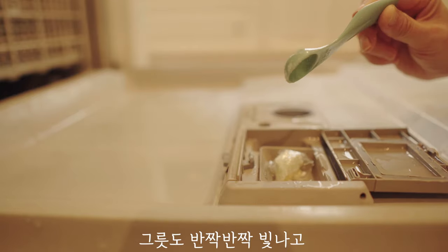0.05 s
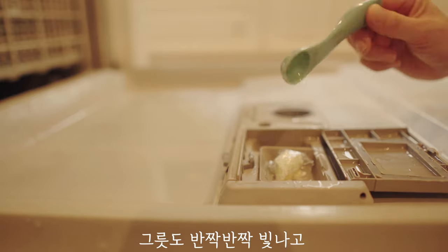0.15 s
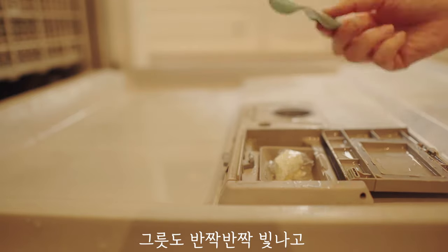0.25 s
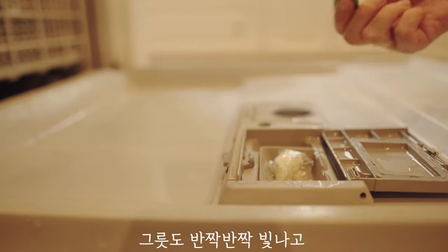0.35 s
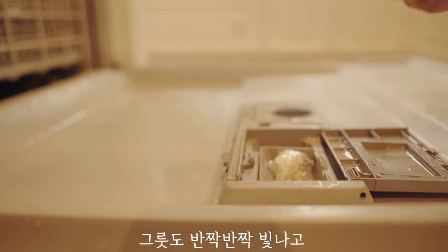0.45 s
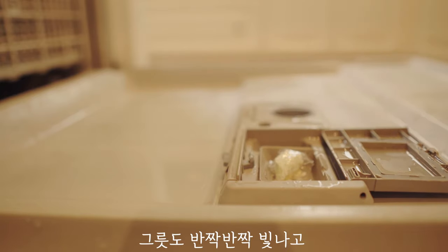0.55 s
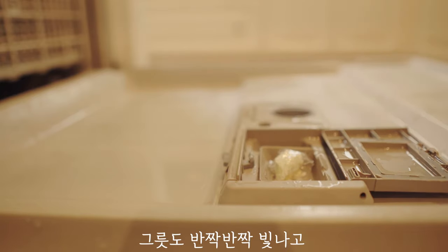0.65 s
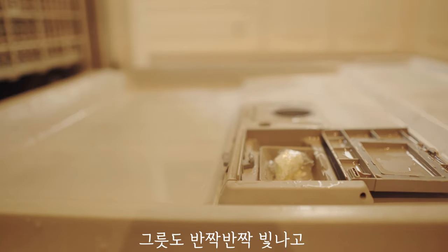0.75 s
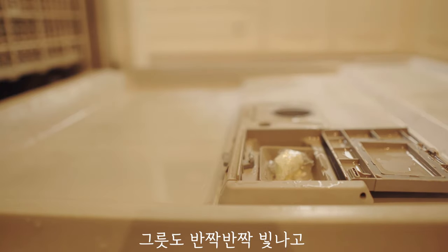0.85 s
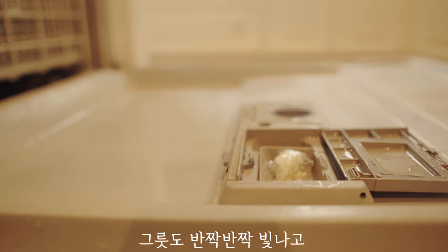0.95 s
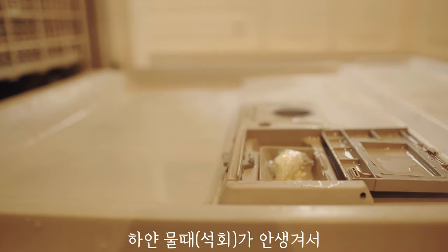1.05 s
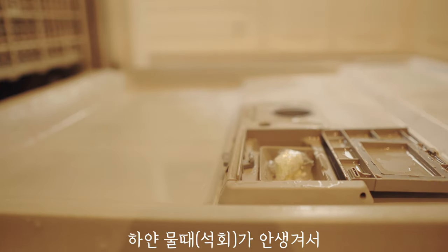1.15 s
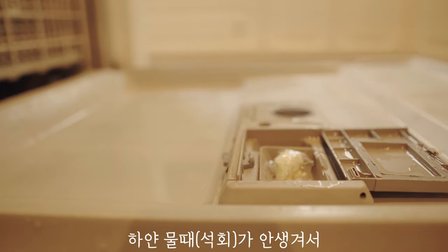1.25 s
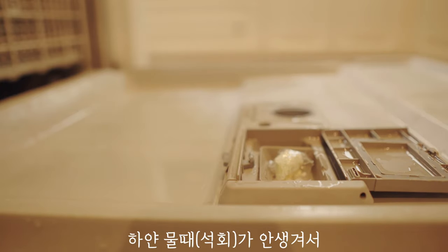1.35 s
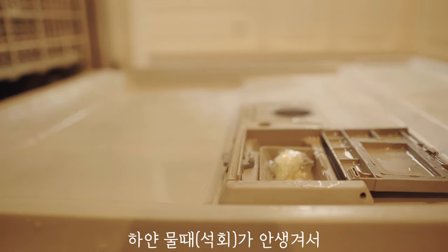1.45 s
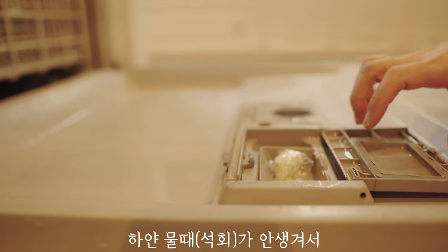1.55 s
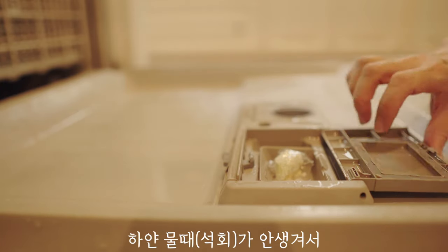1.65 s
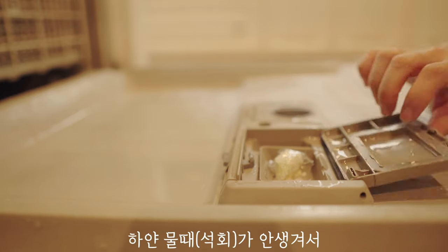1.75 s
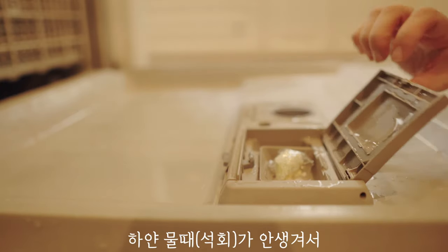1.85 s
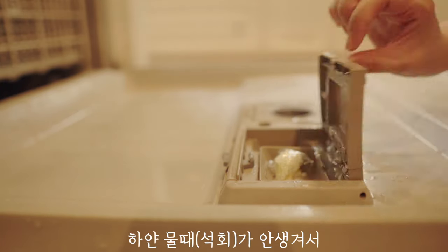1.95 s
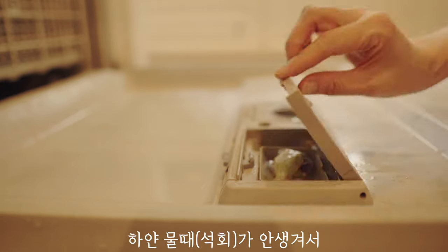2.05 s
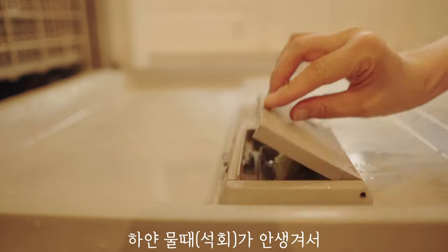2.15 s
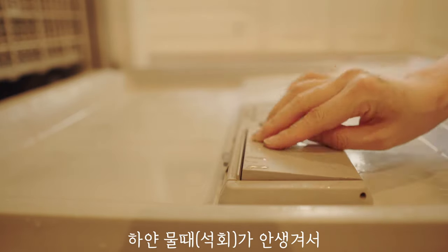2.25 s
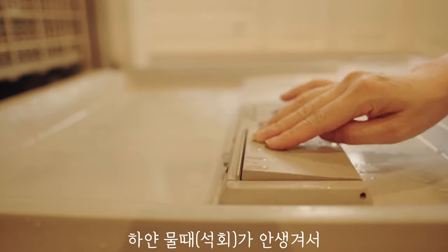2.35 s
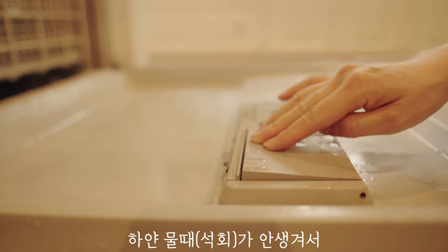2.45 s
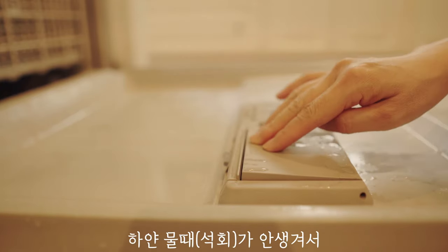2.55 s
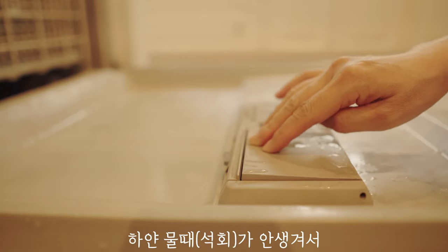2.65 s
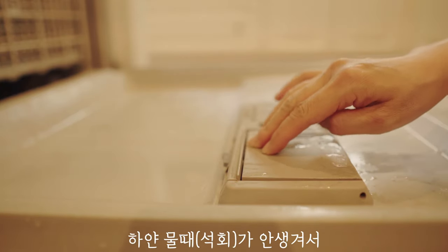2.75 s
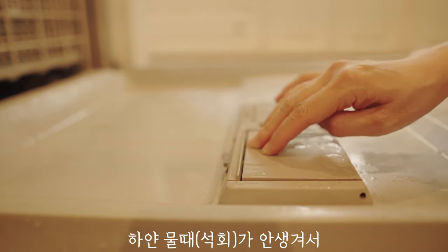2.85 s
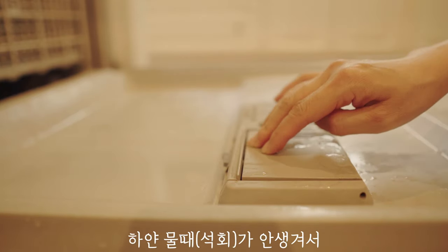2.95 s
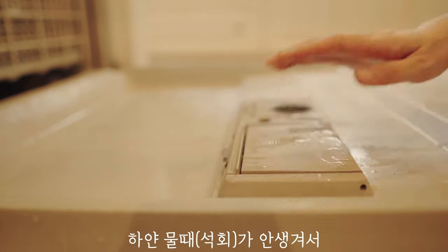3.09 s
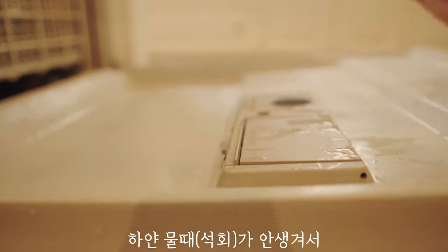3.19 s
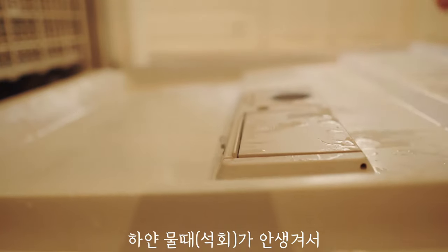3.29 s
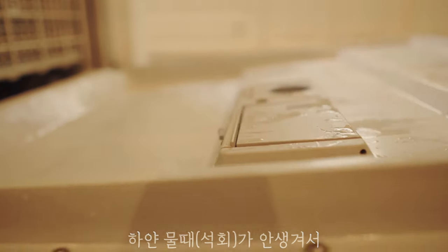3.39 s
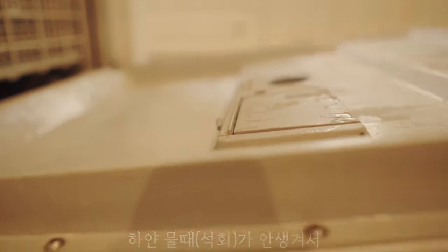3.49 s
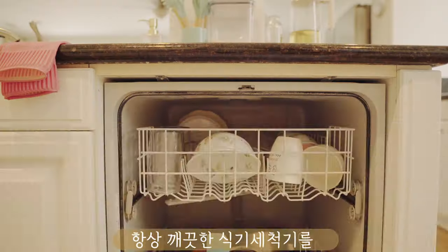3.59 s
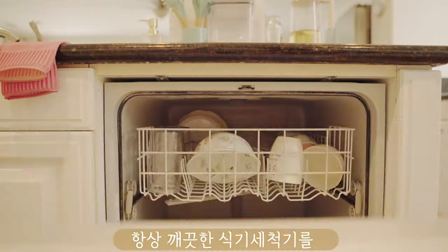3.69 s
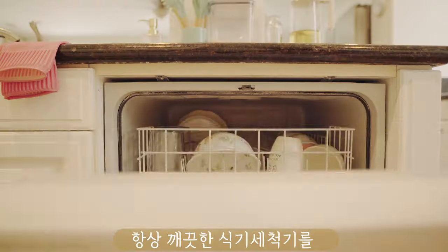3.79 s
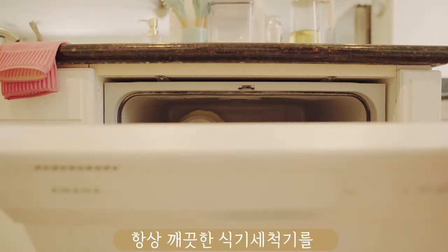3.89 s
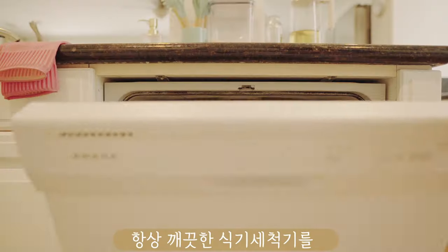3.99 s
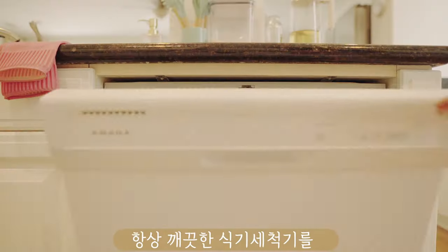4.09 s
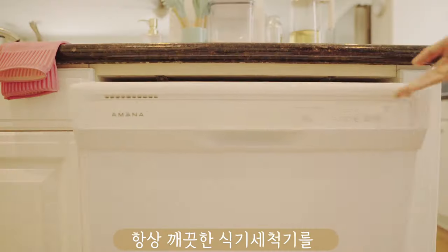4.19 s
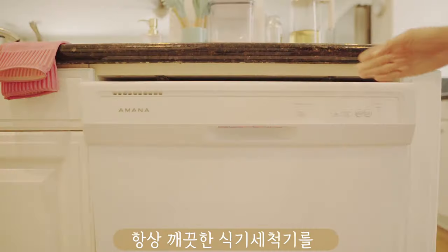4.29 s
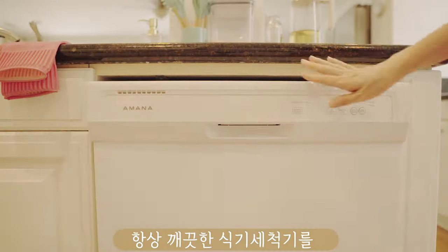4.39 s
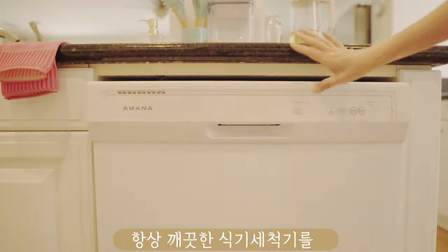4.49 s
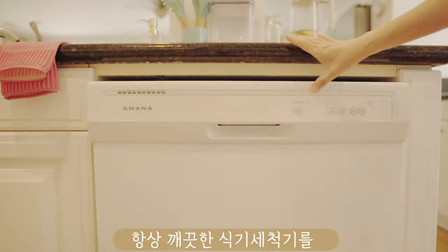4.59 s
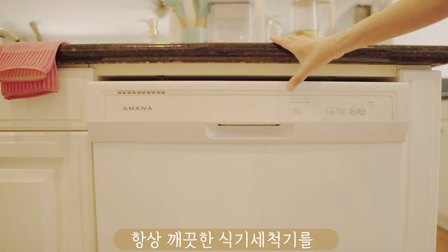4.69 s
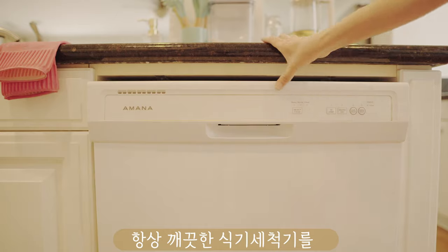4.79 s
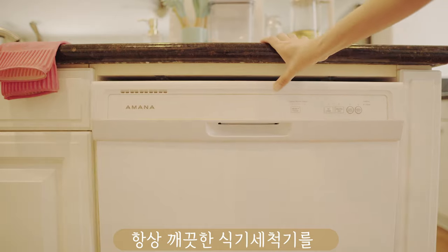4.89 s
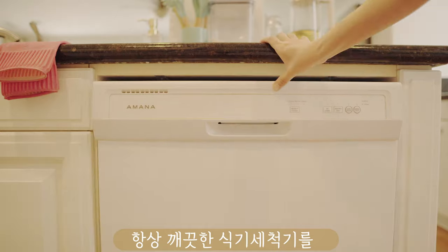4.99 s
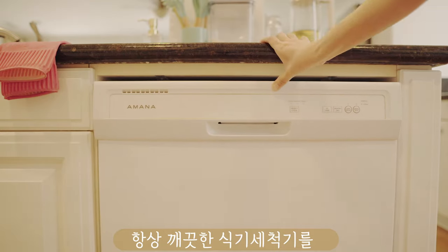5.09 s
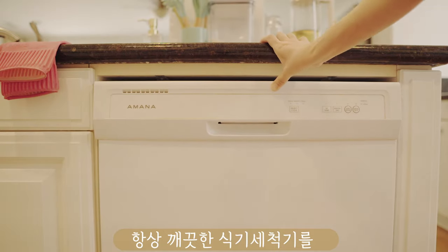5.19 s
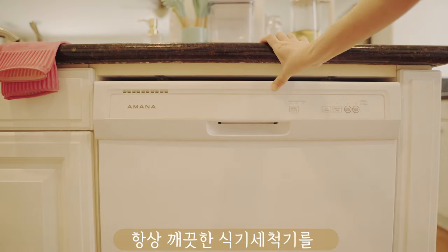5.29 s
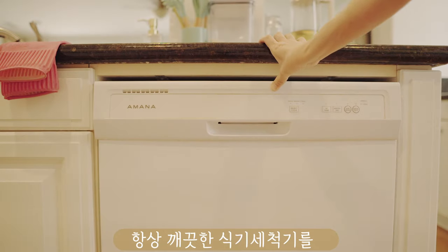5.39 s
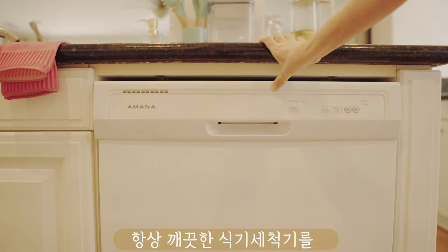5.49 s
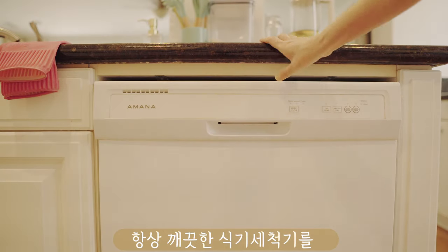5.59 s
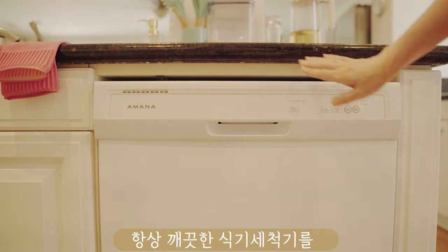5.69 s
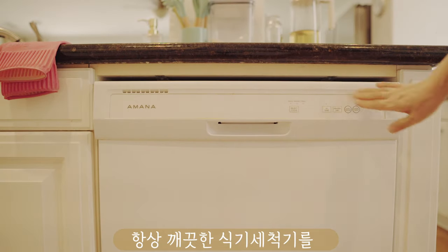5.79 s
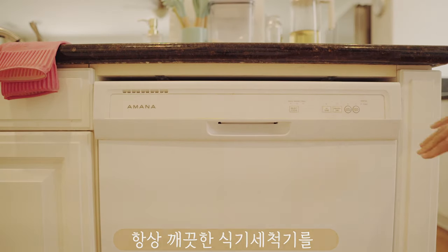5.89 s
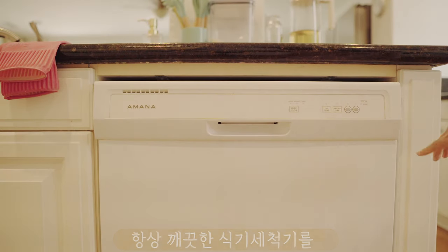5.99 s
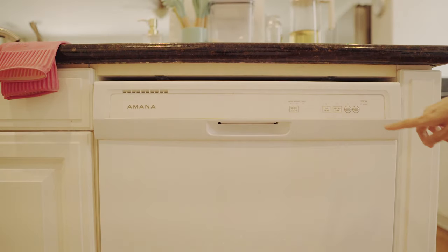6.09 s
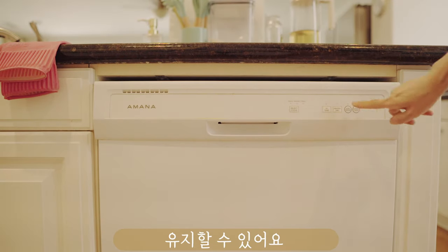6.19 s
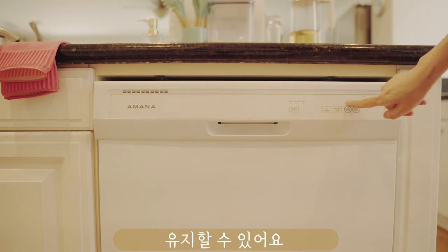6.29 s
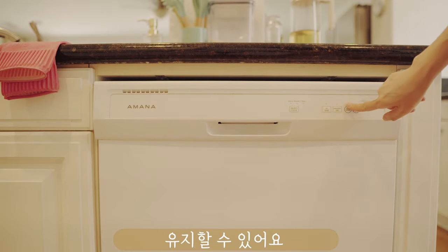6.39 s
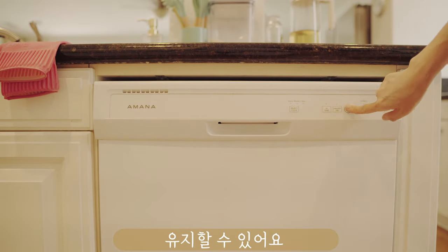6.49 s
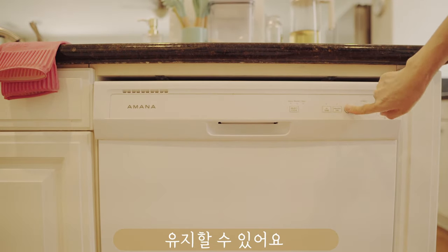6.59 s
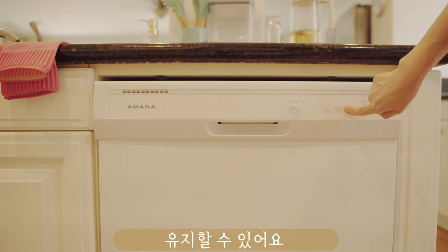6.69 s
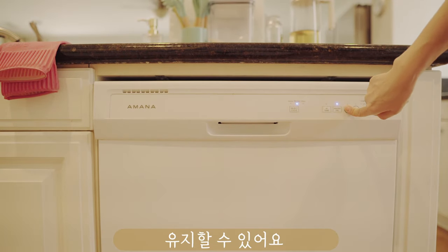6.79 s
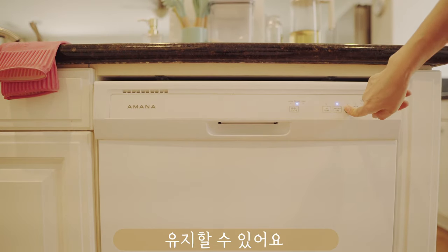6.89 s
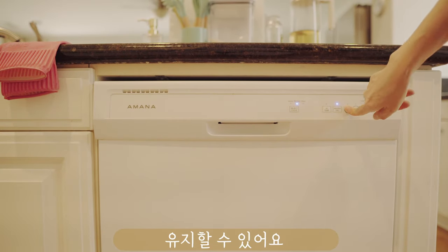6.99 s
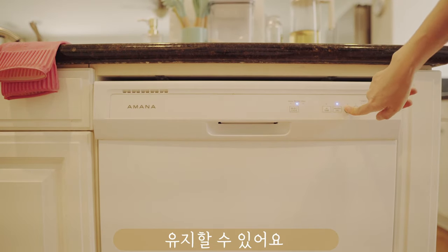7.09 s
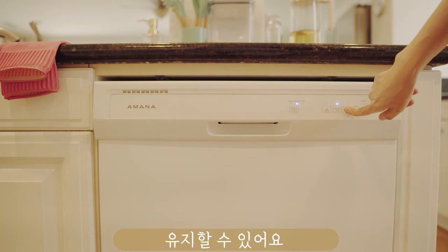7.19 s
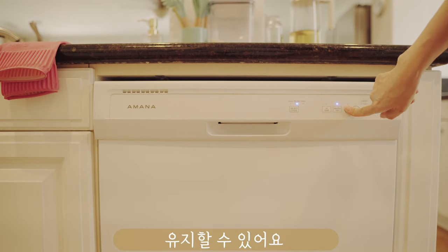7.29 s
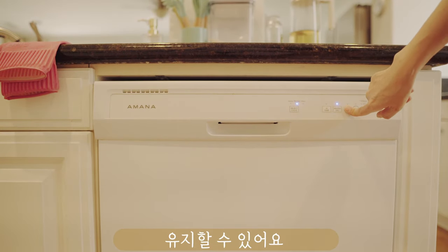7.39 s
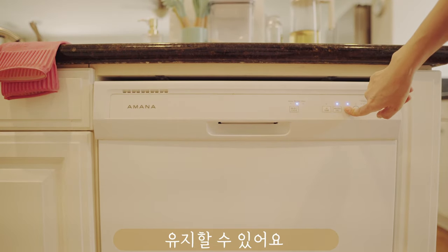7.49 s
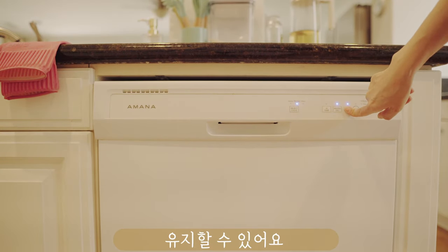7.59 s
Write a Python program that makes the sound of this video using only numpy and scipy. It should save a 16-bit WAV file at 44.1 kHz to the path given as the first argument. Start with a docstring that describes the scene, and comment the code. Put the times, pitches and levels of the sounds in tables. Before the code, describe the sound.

A plastic detergent lid clicks and snaps shut, then a dishwasher door creaks up, thumps into its latch, and buttons click.

```python
"""A dishwasher is made ready in a small kitchen. First a hand rustles about, nudging the plastic lid of
the detergent cup, which clicks, flexes and rubs on its hinge, falls shut and is pressed until it snaps.
From 3.6 s the door swings up on creaking springs and thumps into its latch at 5.2 s, the cabinet
droning low. Last, from 6.7 s, panel buttons click. Quiet room air lies under it all."""
import sys
import numpy as np
from scipy import signal
from scipy.fft import rfft, irfft
from scipy.io import wavfile
from scipy.ndimage import uniform_filter1d

SR = 44100
rng = np.random.default_rng(int(sys.argv[2]) if len(sys.argv) > 2 else 0)


def waveform_to_disk(signal):
    """Save audio, clipped to [-1, 1], as 16-bit WAV at the path in sys.argv[1]."""
    frames = np.transpose(np.atleast_2d(signal))
    scaled = np.clip(frames, -1, 1) * 32767
    samples = np.round(scaled).astype(np.int16)
    wavfile.write(sys.argv[1], SR, samples)


N = 337365
T = np.arange(SR) / SR  # seconds into one hit
NOW = np.arange(N) / SR  # seconds into the scene
TOP_HZ = 15900


# Nudges of the lid. Each row: start in seconds, level in dB, rise in seconds, tilt in dB per octave.
LID_CLICKS = [(.918, -48.5, 0.0028, 4.5), (1.088, -48, .004, 5.5), (1.132, -39, .0015, -0.5),
              (1.1765, -29.5, 0.0025, 1.5), (1.543, -35.5, .0025, -2.5), (1.5892, -27.5, 0.0031, 1),
              (2.217, -44.5, 0.0027, 5), (2.607, -52.5, 0.0026, 1), (3.068, -45, 0.0022, -7),
              (3.554, -48.5, 0.008, 6)]
# Their plastic tone. Each row: frequency in Hz, gain in dB.
LID_COLOUR = [(120, -58), (200, -16), (465, -4), (671, 0), (1530, -2), (2910, -9), (3310, -17.5),
              (4040, -9), (5040, -22.5), (8740, -17.5), (9580, -26), (10300, -23), (15100, -30),
              (16000, -39)]
# The lid's short ring. Each row: pitch in Hz, gain in dB, decay in seconds.
LID_MODES = [(786, 7.5, 0.12), (1423, -6, 0.22), (2135, 7, 0.1), (2560, -12, 0.25), (4090, -0.5, 0.13),
             (4350, -1.5, 0.092), (7400, -4.5, 0.13), (8940, -8, 0.12)]

def lid_clicks():
    """The plastic lid clicks and rings briefly as it is nudged on its hinge."""
    return clicks(LID_CLICKS, LID_COLOUR, t60=0.058, room_db=-7, modes=LID_MODES, modes_db=-8)


# The lid lands. Each row: start in seconds, level in dB, rise in seconds, tilt in dB per octave.
LID_FALL = [(2.2812, -24, 0.0019, 0)]
# The cup's hollow clack. Each row: frequency in Hz, gain in dB.
CUP_COLOUR = [(400, -16), (650, -11), (810, -21), (1050, 2), (1320, -2), (1700, -21), (2600, -15),
              (4500, -32.5), (8000, -35), (13500, -32), (16000, -38)]
# Its tight cluster of tones. Each row: pitch in Hz, gain in dB, decay in seconds.
CUP_MODES = [(1085, 0, .27), (1133, 2, 0.27), (1190, -5, 0.38), (1285, 0.5, 0.26)]

def lid_fall():
    """The lid falls shut and sets the cup ringing."""
    return clicks(LID_FALL, CUP_COLOUR, t60=0.043, room_db=-6.5, modes=CUP_MODES, modes_db=-4)


# The snap. Each row: start in seconds, level in dB, rise in seconds, tilt in dB per octave.
CATCH = [(2.7735, -33, 0.00052, 0.84)]
# Its full-bodied tone. Each row: frequency in Hz, gain in dB.
CATCH_COLOUR = [(88, -49), (150, -38), (240, -3.5), (334, -6.5), (376, 0.5), (439, -7.5), (637, -3.5),
                (905, -18.5), (1260, -4.5), (2140, -12), (2920, -11), (6510, -20), (7620, -23.5),
                (9630, -21), (16000, -28.5)]
# Its long ring. Each row: pitch in Hz, gain in dB, decay in seconds.
CATCH_MODES = [(112, -2.5, 0.84), (372, 9, 0.28), (1270, -2, 0.82), (1660, -2, 0.31), (2500, -5.5, 0.72),
               (2770, -15, 0.58), (3768, -8, 0.74), (4750, -15, 1), (6400, -10, 0.6), (9000, -7, .28),
               (9760, -4, .28), (11100, -4, 0.27)]

def catch_snap():
    """The lid's catch snaps in with a sharp crack that fills the room."""
    return clicks(CATCH, CATCH_COLOUR, t60=0.033, room_db=11, modes=CATCH_MODES, modes_db=2.5)


# Blows on the liner. Each row: start in seconds, level in dB, contact time in seconds.
LINER_THUDS = [(1.544, -38, 0.0031), (1.69, -39, 0.0097), (1.77, -41, 0.014), (2.2835, -20.5, 0.0014),
               (2.770, -32, 0.0005), (2.83, -39, 0.017), (3.068, -37.5, 0.0019), (3.5585, -29, 0.0015),
               (3.573, -31, 0.0026)]
# Its boxy body. Each row: pitch in Hz, gain in dB, decay in seconds.
LINER_MODES = [(72.8, -23, 0.82), (106.4, -13, 0.44), (185, -16, 0.2), (212, -2.5, 0.2), (237.5, 6.5, 0.1),
               (366, -2, 0.16), (417, -7, 0.21), (583, -12, 0.28), (700, -3.5, 0.12)]

def liner_thuds():
    """Soft blows wake the low modes of the hollow door liner."""
    return thuds(LINER_THUDS, LINER_MODES, room_db=-14.0)


# The lid bends as it turns over. Each row: start in seconds, level in dB, pitch in Hz, rise in seconds.
LID_FLEXES = [(1.605, -28.5, 253, 0.0027), (1.724, -40, 246.5, 0.0074), (2.038, -37, 231, 0.003),
              (2.088, -38.5, 250, 0.0071), (2.189, -30.5, 249, 0.013)]

def lid_flexes(t60=0.12):
    """The lid's lowest bending mode swells and dies; its pitch shifts with the grip."""
    out = np.zeros(N)
    for start, db, hz, rise in LID_FLEXES:
        swell = 1 - np.exp(-(T / rise) ** 2)
        add(out, start, dose(ring([(hz, 0, t60)]) * swell, db))
    return out


# Turns of the lid. Each row: start in seconds, length in seconds, relative level in dB.
HINGE_RUBS = [(1.59, 0.22, -47), (1.87, 0.36, -44), (2.21, 0.12, -39)]
# The hinge's low grumble. Each row: pitch in Hz, gain in dB, decay in seconds.
HINGE_MODES = [(102, -10.5, 0.15), (241, 2, 0.056), (295, -7, 0.028), (378, -6.5, 0.058), (630, -18, .06)]

def hinge_rub():
    """The hinge sticks and slips coarsely as the lid turns."""
    loudness = moves(HINGE_RUBS, attack_share=0.23, release_s=0.078)
    return friction(HINGE_MODES, grain_db=3.0, grain_hz=118.0) * loudness


# A finger slide. Each row: start in seconds, length in seconds, relative level in dB.
SLIDES = [(3.12, 0.1, -45)]
# Faint whistling tones. Each row: pitch in Hz, gain in dB, decay in seconds.
WHISTLE_TONES = [(2140, -0.5, 0.066), (3040, 1, 0.035), (3620, -3, .04), (4200, -9, .05), (5180, -9, .05),
                 (6060, -7, 0.033), (7060, -9, .05), (10300, -5, .03)]

def finger_slide():
    """Fingertips slide off the shut lid: a brief, thin, high scrape with faint whistling tones."""
    loudness = moves(SLIDES, attack_share=0.26, release_s=0.037)
    return friction(WHISTLE_TONES, grain_db=2, grain_hz=898) * loudness


# Creaks of the moving door. Each row: start in seconds, length in seconds, relative level in dB.
CREAKS = [(3.615, 0.21, -36.5), (3.86, 0.052, -32.5), (3.965, 0.27, -33), (4.35, 0.039, -42),
          (4.86, 0.19, -47.5), (5.075, 0.036, -47)]
# The door skin's dark tone. Each row: frequency in Hz, gain in dB.
SKIN_COLOUR = [(70, -14.5), (120, -5.5), (175, -7), (290, -3.5), (400, -5), (550, -2), (780, -7.5),
               (1050, -7), (1250, -18), (2010, -19), (3800, -27), (6500, -45)]
# The twang of the coils. Each row: pitch in Hz, gain in dB, decay in seconds.
SPRING_MODES = [(170, -5.5, 0.24), (283.6, -2, 0.13), (502, -1.5, 0.15), (582, -5.5, 0.13),
                (689, -4.5, .12), (842, -4, 0.1), (1008, 0, 0.15), (1100, -3, 0.088)]

def springs(slips_per_s=450, scatter_db=8, coil_db=-5, room_db=-2):
    """The stretched springs slip in uneven jerks; each jerk rings the coils and the door skin."""
    slipping = rng.random(N) < slips_per_s / SR
    jerks = slipping * rng.choice([-1, 1], N) * undb(scatter_db * rng.random(N))
    skin = colour(through(jerks, crack(rise=0.00039, t60=0.022)), SKIN_COLOUR)
    coils = through(jerks, ring(SPRING_MODES))
    creak = level(level(skin, 0) + level(coils, coil_db), -1.7)
    creak *= moves(CREAKS, attack_share=0.057, release_s=0.038)
    return creak + undb(room_db) * through(creak, kitchen())


# Bumps of the door. Each row: start in seconds, level in dB, contact time in seconds.
DOOR_THUMPS = [(3.67, -38, 0.0021), (3.84, -38.5, 0.0034), (4.25, -32.5, 0.013), (4.37, -35.5, 0.011),
               (4.505, -37.5, 0.0078), (4.924, -28.5, 0.0025), (5.018, -31, 0.013), (5.07, -37.5, 0.019),
               (5.209, -24, 0.0017), (5.475, -33.5, 0.0071)]
# Its deep boom. Each row: pitch in Hz, gain in dB, decay in seconds.
DOOR_MODES = [(76.9, -8, 0.64), (177.4, -5.5, 0.21), (251.5, -11, 0.64), (297.5, -11.5, 0.34),
              (426, -5, 0.26), (560, -6.5, 0.4), (783, -16, 0.41)]

def door_thumps():
    """The whole door bumps on its springs and seal."""
    return thuds(DOOR_THUMPS, DOOR_MODES, room_db=-18.0)


# A run of ticks. Each row: start in seconds, level in dB, rise in seconds, tilt in dB per octave.
RATCHET = [(4.054, -50, .003, 2), (4.082, -51, .003, 5), (4.105, -43.5, .003, -0.5),
           (4.134, -44, 0.0027, -0.5), (4.166, -46.5, .003, 0), (4.203, -46.5, 0.0027, 2),
           (4.238, -47, .003, -1), (4.275, -51, 0.0027, -4), (4.377, -45.5, 0.0017, 2)]
# The hook's bright tone. Each row: frequency in Hz, gain in dB.
HOOK_COLOUR = [(900, -6), (1900, 3.5), (4500, -12.5), (7500, -11.5), (9300, -7), (12000, -13), (14000, -16),
               (16000, -26)]
# Its high ping. Each row: pitch in Hz, gain in dB, decay in seconds.
HOOK_MODES = [(3460, -1, 0.13), (5780, 5, 0.078), (6700, -3, 0.12), (8500, 2, 0.086), (9250, -2, 0.13),
              (9480, -7, .12), (11700, -8, .12), (12500, -8, .12), (13800, -5, .12)]

def hook_ratchet():
    """A spring hook ratchets over its seat, pinging at each skip."""
    return clicks(RATCHET, HOOK_COLOUR, t60=0.047, room_db=-4.5, modes=HOOK_MODES, modes_db=-2.5)


# Knocks of hinges and latch, then the slam. Each row: start in seconds, level in dB, rise in seconds,
# tilt in dB per octave, ring of the contact point in Hz, its lift in dB.
LATCH_KNOCKS = [(3.622, -31.5, 0.0011, -7, 750, 11), (3.678, -37, 0.0045, -5.5, 520, 13),
                (3.881, -41.5, 0.0016, -1, 2900, 14), (4.035, -30.5, 0.0083, -5, 600, 13),
                (4.238, -33.5, 0.0044, -3.5, 586, 15), (4.9085, -34, 0.00086, -2, 2250, 9),
                (4.936, -47, .001, 1.5, 3000, 1), (5.0055, -37.5, .0006, -1.5, 3560, 17),
                (5.063, -32.5, 0.0023, -4, 480, 8), (5.095, -40, 0.0039, -3.5, 520, 12),
                (5.1665, -35, 0.00074, -3.5, 600, 7), (5.476, -41.5, 0.0027, -2.5, 414, 1)]
SLAM = [(5.1996, -26.5, 0.0014, -0.74, 15000, 3), (5.243, -32.5, 0.0056, -3, 700, 6),
        (5.291, -31.5, 0.0042, -1.5, 760, 4)]
# Their broad clunk. Each row: frequency in Hz, gain in dB.
LATCH_COLOUR = [(71, -36), (120, -9), (251, -5), (289, -11), (410, -5.5), (513, -6.5), (727, -6),
                (892, -10), (1210, -12), (1550, -5.5), (2430, -15), (2640, -13.5), (7660, -19),
                (14700, -26.5), (16000, -43)]
# The latch's ring. Each row: pitch in Hz, gain in dB, decay in seconds.
LATCH_MODES = [(740, 4.5, 0.54), (784, 1, 0.35), (1625, -1, 0.57), (1800, -11, 0.73), (2630, -8, 0.52),
               (2870, -19, 0.27), (4425, -19, 0.51), (7270, -7, .2), (15200, -2, .08)]

def latch():
    """Hinges knock, the latch rides up its ramp and drops in; the rebound rattles the cabinet."""
    knocks = clicks(LATCH_KNOCKS, LATCH_COLOUR, t60=0.11, room_db=-1.5, modes=LATCH_MODES, modes_db=-15.5)
    slam = clicks(SLAM, LATCH_COLOUR, t60=0.049, room_db=4.0, modes=LATCH_MODES, modes_db=-4.0)
    return knocks + slam


# Crisp button clicks, the last as a button springs back; one dull release thud.
# Each row: start in seconds, level in dB, rise in seconds, tilt in dB per octave.
BUTTON_CLICKS = [(6.6658, -32, .0003, 1), (7.4085, -31.5, .0003, 0.5), (7.6445, -38.5, 0.0011, 4)]
RELEASE_THUD = [(6.922, -38.5, .0005, 0)]
# The tones of click and thud. Each row: frequency in Hz, gain in dB.
BUTTON_COLOUR = [(120, -45), (200, -18.5), (305, -21), (500, -9), (579, -11), (777, -16), (968, -0.5),
                 (1060, -9.5), (1710, -9), (2020, -11), (2610, -15), (4430, -21.5), (4950, -29),
                 (6050, -24.5), (16000, -46.5)]
THUD_COLOUR = [(200, -12.5), (330, -5), (430, 3), (600, 1), (850, -11), (1600, -21), (3000, -32),
               (8000, -45)]
# The panel's ring. Each row: pitch in Hz, gain in dB, decay in seconds.
PANEL_MODES = [(938, 7.5, 0.17), (1313, -19, 0.46), (1580, -2, 0.18), (2050, -8, 0.53), (2270, -18, 0.31),
               (2670, -10, 0.58), (2810, -8, 0.38), (3320, -22, 0.47), (3920, -22, 0.36), (5700, -24, 0.47)]

def buttons():
    """Buttons click and ring the panel; one thuds softly as the finger lets go."""
    crisp = clicks(BUTTON_CLICKS, BUTTON_COLOUR, t60=0.13, room_db=-4.0, modes=PANEL_MODES, modes_db=-7)
    return crisp + clicks(RELEASE_THUD, THUD_COLOUR, t60=0.18, room_db=-9.5)


# Strokes of hand, sleeve or sliding door parts.
# Each row: start in seconds, length in seconds, relative levels of rub and of hiss in dB.
STROKES = [(0.42, 0.51, -48, -56), (.93, 0.25, -50, -57), (1.086, 0.31, -46, -50.5),
           (1.367, 0.092, -43, -42.5), (1.517, 0.2, -51.5, -52.5), (1.804, 0.51, -44.5, -52),
           (2.326, 0.23, -49.5, -57), (3.02, .06, -52, -53), (3.129, 0.1, -45, -45.5),
           (3.25, 0.46, -52, -74), (3.584, 0.41, -50, -53), (3.982, .22, -43, -49),
           (4.35, 0.064, -48.5, -54.5), (4.445, .33, -61, -59.5), (5.737, 0.04, -54.5, -73)]
# The tones of rub and hiss. Each row: frequency in Hz, gain in dB.
RUB_COLOUR = [(120, 0.5), (250, -2.5), (500, -3.5), (1000, -5), (2000, -4), (3500, -9.5), (6000, -15.5),
              (10000, -26)]
HISS_COLOUR = [(2000, -13), (4000, 0.5), (7000, -2.5), (10000, -3), (14000, -6), (16000, -12)]

def rustle():
    """Sliding surfaces: fine grains of friction make a dull rub and a bright hiss."""
    out = np.zeros(N)
    starts, lengths, rub_db, hiss_db = np.transpose(STROKES)
    for db, outline in ((rub_db, RUB_COLOUR), (hiss_db, HISS_COLOUR)):
        texture = colour(grains(grain_db=2.0, grain_hz=1500), outline)
        loudness = moves(zip(starts, lengths, db), attack_share=0.28, release_s=0.066)
        out += level(texture, -0.76) * loudness
    return out


# The drone's swell. Each row: start in seconds, length in seconds, relative level in dB.
DRONE_SWELL = [(4.05, 1.66, -52)]

def cabinet_drone(hz=44, t60=0.23):
    """A low resonance of the cabinet swells as the door closes."""
    resonance = np.cos(2 * np.pi * hz * T) * fade(t60) * (1 - fade(t60))
    drone = through(rng.standard_normal(N), resonance)
    return level(drone, -1.6) * moves(DRONE_SWELL, attack_share=0.25, release_s=0.57)


# A dark bed of room tone. Each row: frequency in Hz, gain in dB.
AIR_COLOUR = [(12, -36), (20, -4), (49, -10), (70, -8.5), (277, -14.5), (399, -14), (642, -15.5),
              (873, -17), (1610, -21), (1860, -21), (5380, -30), (7730, -30.5), (16000, -35)]

def room_air(start_db=-51.5, waver_db=0.99, fade_db_per_s=0.53):
    """Quiet room noise wavers a little and grows slowly fainter."""
    air = level(colour(rng.standard_normal(N), AIR_COLOUR), start_db)
    return air * undb(waver_db * walk(3.405) - fade_db_per_s * NOW)


def kitchen(t60=0.76, damp_hz=21700, build_s=0.0093):
    """Diffuse room tail of unit energy; it builds up quickly and the treble dies first."""
    hz, seconds, cells = signal.stft(rng.standard_normal(SR), SR, nperseg=256)
    band_t60 = t60 / (1 + hz[:, None] / damp_hz)
    tail = signal.istft(cells * np.exp(-np.log(1000) * seconds / band_t60))[1][:SR]
    tail *= 1 - np.exp(-T / build_s)
    return tail / np.sqrt(np.sum(tail ** 2))


def clicks(rows, outline, t60, room_db, modes=(), modes_db=0):
    """Hard contacts on one part: a coloured crack, the part's modes, and the room's answer."""
    out, room = np.zeros(N), kitchen()
    rings = [(hz, ring([(hz, db, decay)])) for hz, db, decay in modes]
    for start, db, rise, tilt_db, *spot in rows:
        hit = colour(crack(rise, t60), outline, tilt_db)
        tail = colour(room, outline, tilt_db)
        if spot:  # the place that is struck favours one broad band
            spot_hz, lift_db = spot
            band = signal.iirpeak(spot_hz, Q=2, fs=SR)
            hit, tail = (x + (undb(lift_db) - 1) * signal.lfilter(*band, x) for x in (hit, tail))
        add(out, start, dose(hit, db) + dose(tail, db + room_db))
        if rings:  # a harder contact wakes more of the high modes
            tone = sum(undb(tilt_db * np.log2(hz / 1000)) * wave for hz, wave in rings)
            add(out, start, dose(tone * (1 - np.exp(-T / rise)), db + modes_db))
    return out


def thuds(rows, modes, room_db, lowest_hz=65):
    """Soft pushes on a panel: the longer the contact, the fewer high modes ring."""
    out = np.zeros(N)
    panel = colour(ring(modes), [(lowest_hz, 0), (TOP_HZ, 0)])  # the deepest bass rolls off below lowest_hz
    for start, db, contact in rows:
        push = np.sin(np.pi * np.minimum(T / contact, 1)) * np.exp(-2 * T / contact)
        add(out, start, dose(through(panel, push), db))
    return out + undb(room_db) * through(out, kitchen())


def friction(tones, grain_db, grain_hz):
    """Stick-slip noise, coloured by short ringing tones."""
    return level(through(grains(grain_db, grain_hz), ring(tones)), -0.88)


def grains(grain_db, grain_hz):
    """Noise roughened by a flickering level."""
    return rng.standard_normal(N) * undb(grain_db * walk(grain_hz))


def moves(rows, attack_share, release_s):
    """Loudness of movements: each speeds up for a share of its length, holds, then runs out."""
    power = np.zeros(N)
    for start, length, db in rows:
        attack = np.clip((NOW - start) / (attack_share * length), 0, 1)
        release = np.exp(-np.maximum(NOW - start - length, 0) / release_s)
        power += (undb(db) * attack * release) ** 2
    return np.sqrt(power)


def crack(rise, t60):
    """Dense chatter of a contact that swells and dies, its energy spread evenly over frequency."""
    swell = 1 - np.exp(-(T / rise) ** 2)
    spectrum = rfft(rng.standard_normal(SR) * swell * fade(t60), 2 * SR)
    smooth_power = uniform_filter1d(abs(spectrum) ** 2, size=500)
    return irfft(spectrum / np.sqrt(smooth_power + 1e-9))[:SR]


def ring(modes):
    """Ringing tones, each falling 60 dB over its decay time."""
    return sum(undb(db) * fade(t60) * np.sin(2 * np.pi * hz * T) for hz, db, t60 in modes)


def colour(x, outline, tilt_db=0, size=4096):
    """Causal filter with the given (Hz, dB) outline, tilted about 1 kHz."""
    octave = np.log2(np.maximum(np.fft.rfftfreq(size, 1 / SR), 1))
    hz, db = np.transpose(outline)
    octaves_below = np.maximum(np.log2(hz[0]) - octave, 0)
    shape_db = np.interp(octave, np.log2(hz), db) + tilt_db * (octave - np.log2(1000))
    shape_db -= 12 * octaves_below
    cepstrum = irfft(np.log(undb(shape_db)))[:size // 2]
    cepstrum[1:] *= 2  # minimum phase keeps attacks sharp
    return through(x, irfft(np.exp(rfft(cepstrum, size))))


def walk(rate_hz):
    """Random drift with a spread near 1."""
    step = int(SR / rate_hz)
    return uniform_filter1d(np.repeat(rng.standard_normal(N // step + 1), step), step)[:N]


def level(x, db):
    """Set the rms level of a lasting sound."""
    return x * undb(db) / np.std(x)


def dose(x, db):
    """Set the energy of a hit, as its level if packed into 20 ms."""
    return x * undb(db) / np.sqrt(np.sum(x ** 2) / (.02 * SR))


def undb(db):
    return 10 ** (np.asarray(db) / 20)


def fade(t60):
    return np.exp(-np.log(1000) * T / t60)


def through(x, response):
    return signal.fftconvolve(x, response)[:len(x)]


def add(out, start_s, x):
    i = int(start_s * SR)
    out[i:i + len(x)] += x[:N - i]


def scene():
    """Lid, door and buttons over rustle and room air, the same in both ears."""
    lid = lid_clicks() + lid_fall() + catch_snap() + liner_thuds()
    lid += lid_flexes() + hinge_rub() + finger_slide()
    door = springs() + door_thumps() + hook_ratchet() + latch()
    return np.tile(lid + door + buttons() + rustle() + room_air() + cabinet_drone(), (2, 1))


def record(dry):
    """A steep low-pass cuts the highest treble."""
    return signal.sosfilt(signal.ellip(10, .2, 70, TOP_HZ, fs=SR, output="sos"), dry)


dry = scene()
out = record(dry)
waveform_to_disk(out)
```